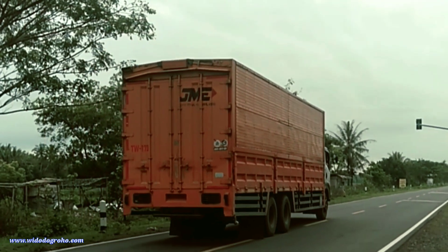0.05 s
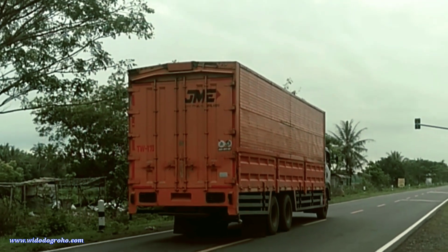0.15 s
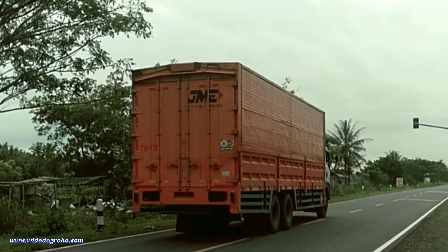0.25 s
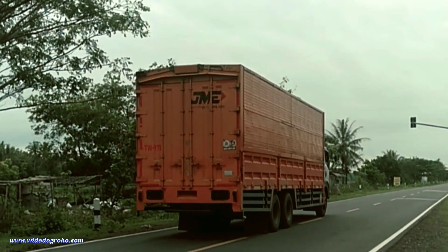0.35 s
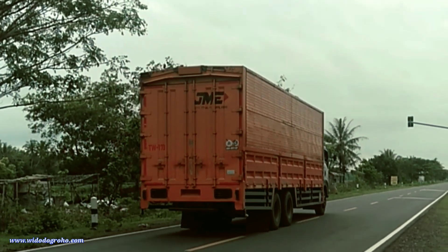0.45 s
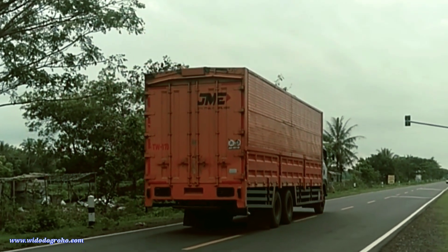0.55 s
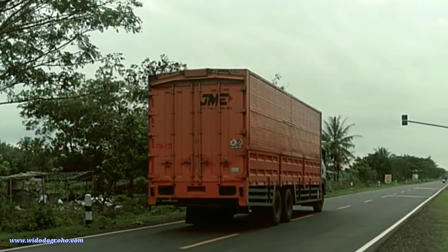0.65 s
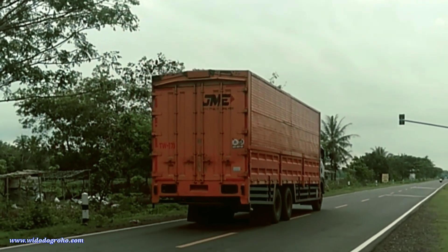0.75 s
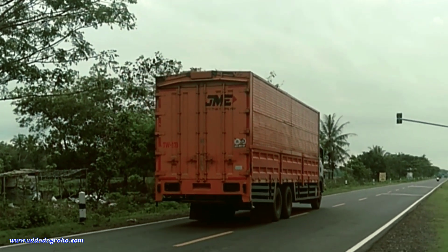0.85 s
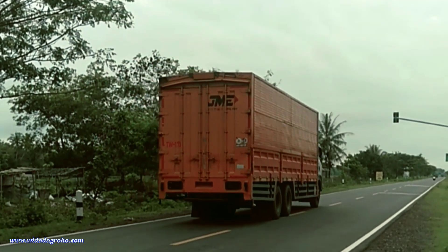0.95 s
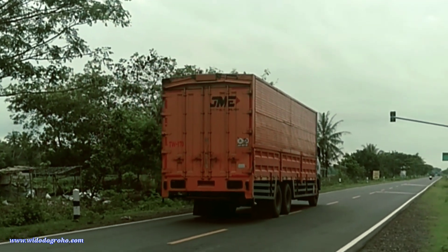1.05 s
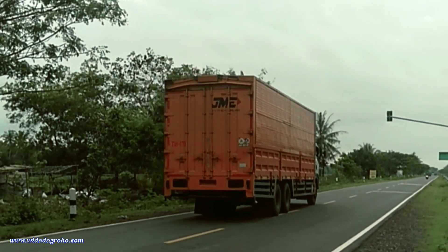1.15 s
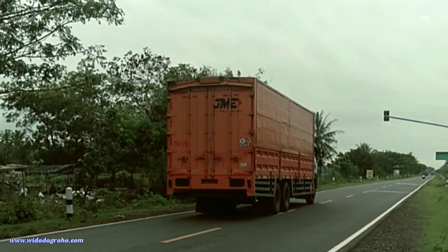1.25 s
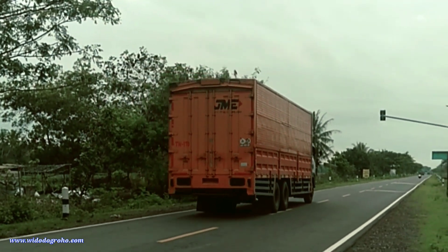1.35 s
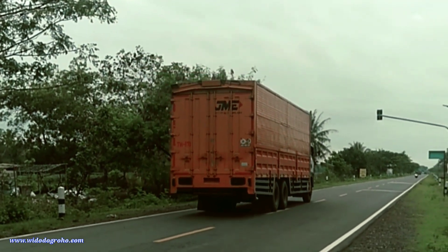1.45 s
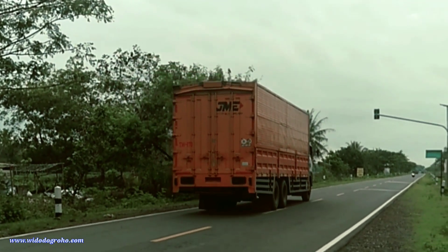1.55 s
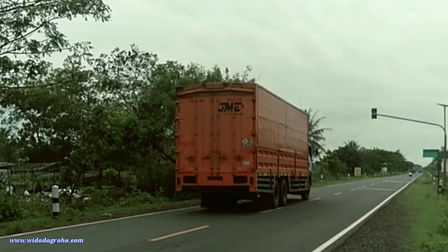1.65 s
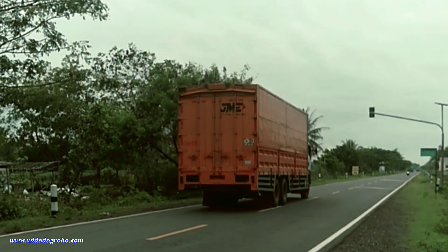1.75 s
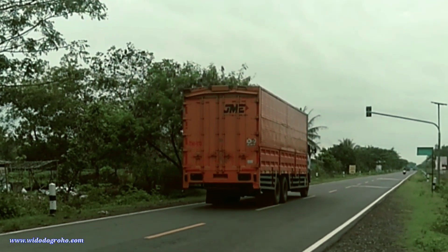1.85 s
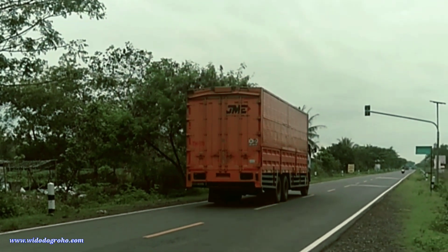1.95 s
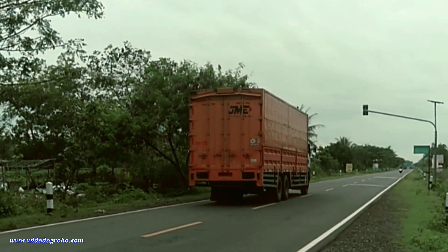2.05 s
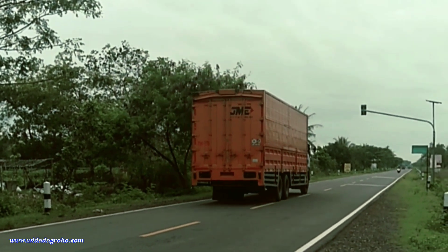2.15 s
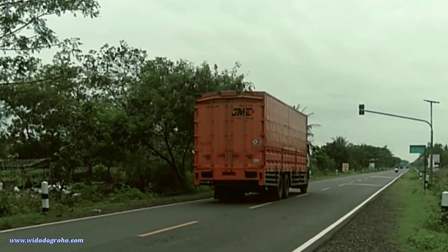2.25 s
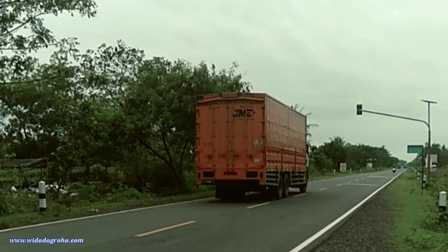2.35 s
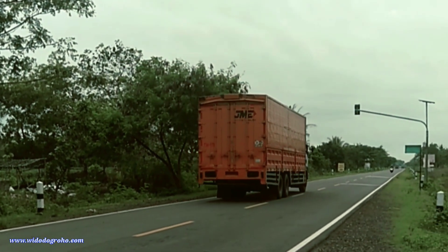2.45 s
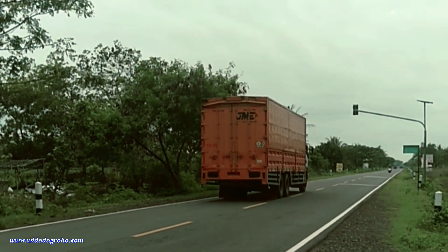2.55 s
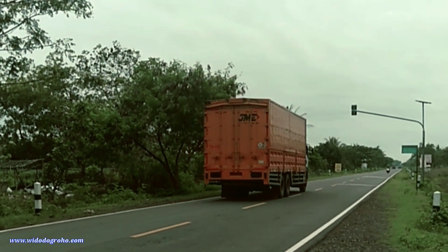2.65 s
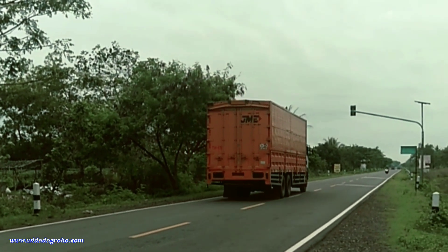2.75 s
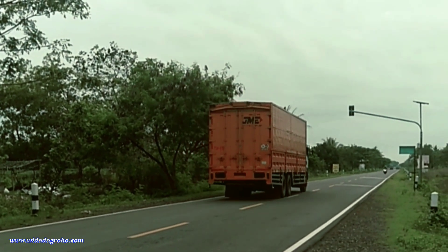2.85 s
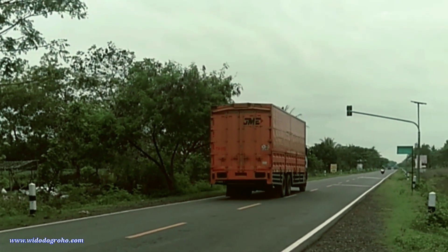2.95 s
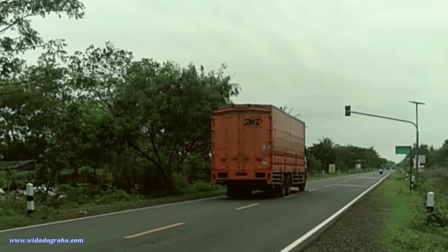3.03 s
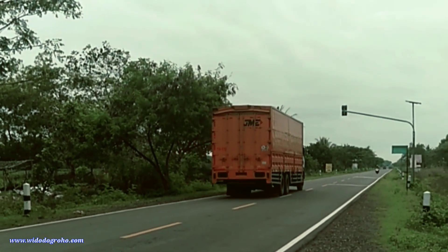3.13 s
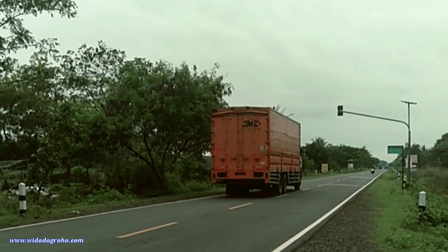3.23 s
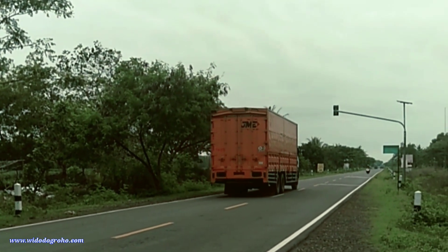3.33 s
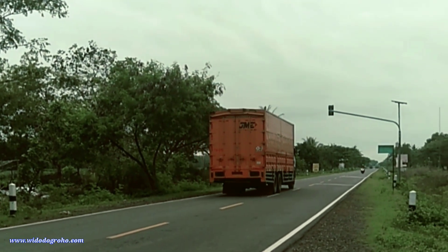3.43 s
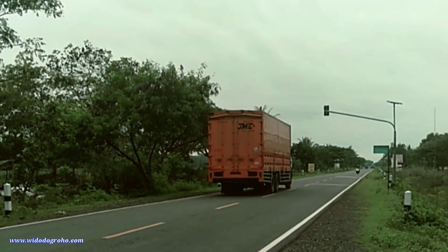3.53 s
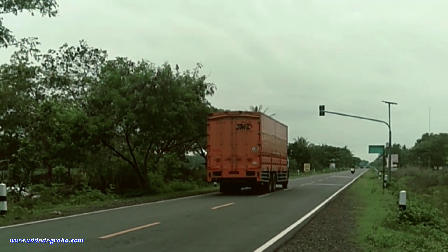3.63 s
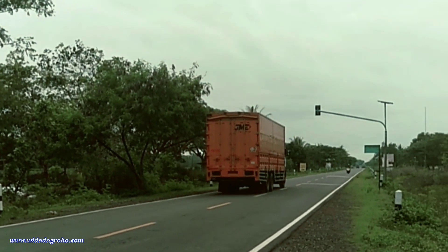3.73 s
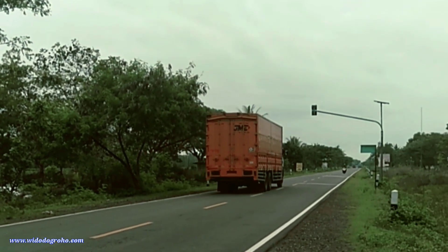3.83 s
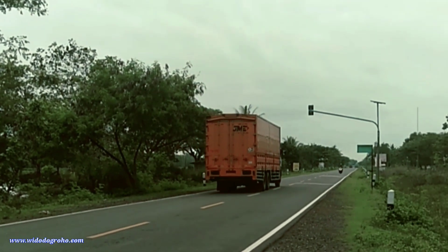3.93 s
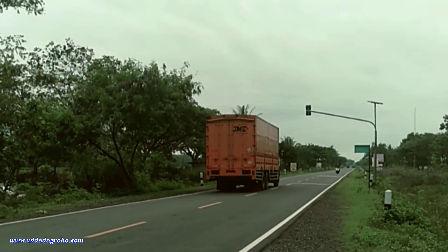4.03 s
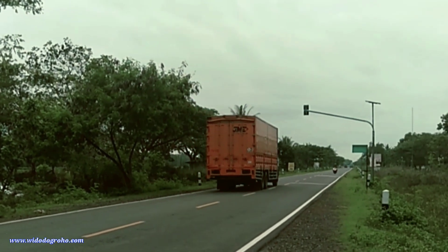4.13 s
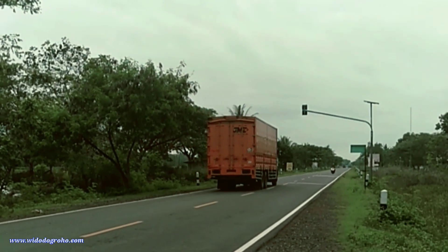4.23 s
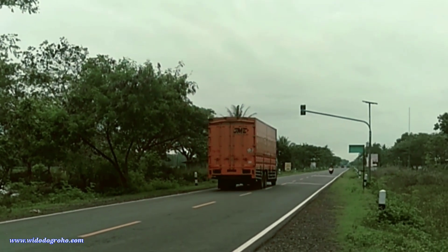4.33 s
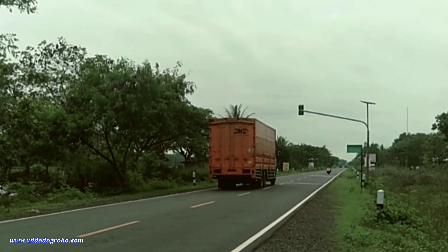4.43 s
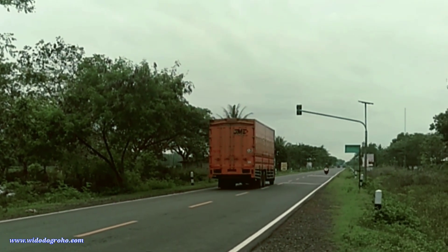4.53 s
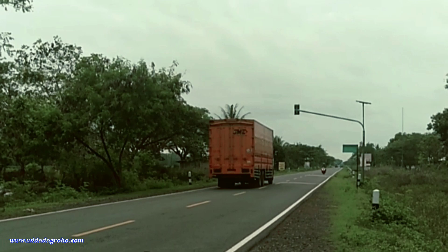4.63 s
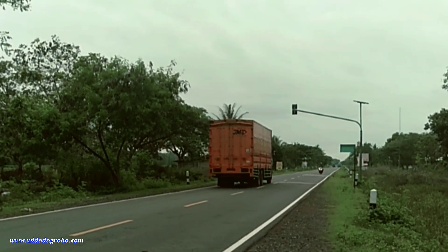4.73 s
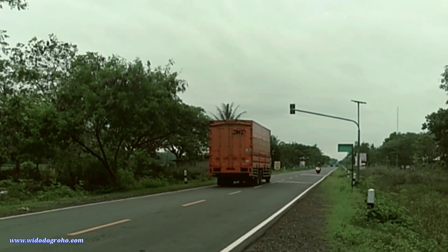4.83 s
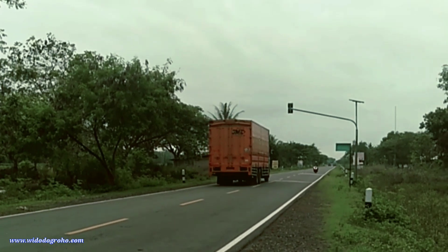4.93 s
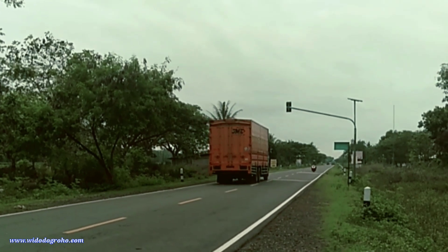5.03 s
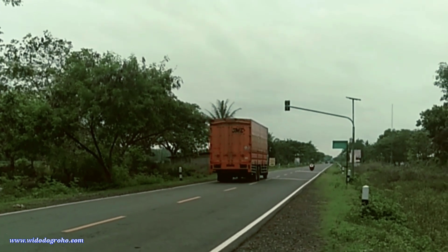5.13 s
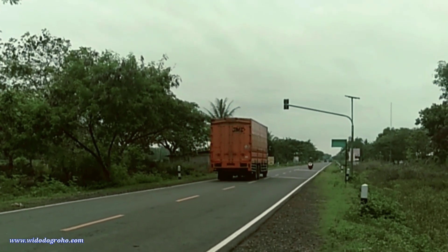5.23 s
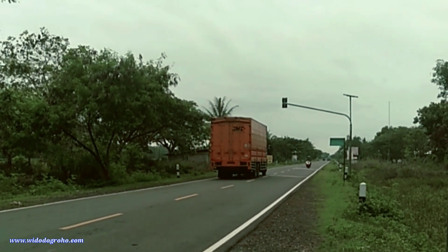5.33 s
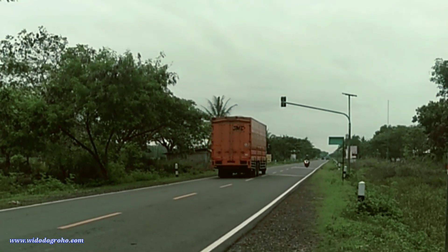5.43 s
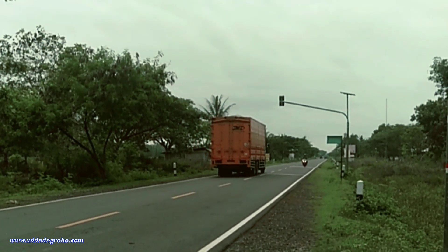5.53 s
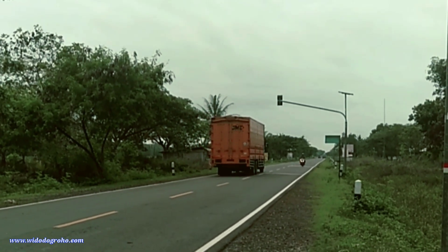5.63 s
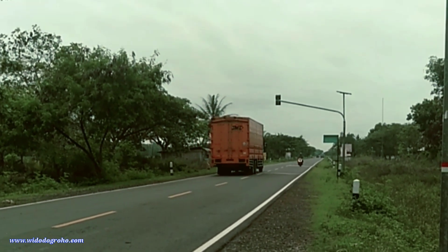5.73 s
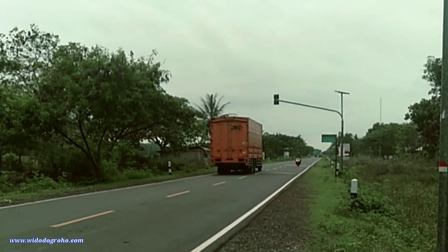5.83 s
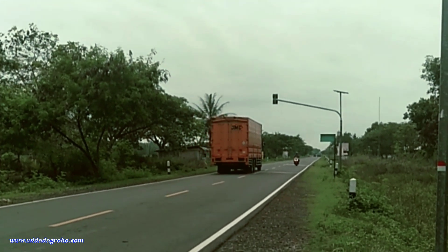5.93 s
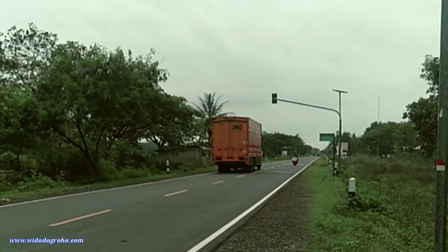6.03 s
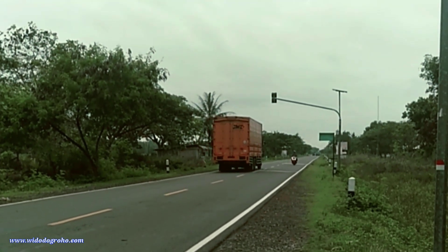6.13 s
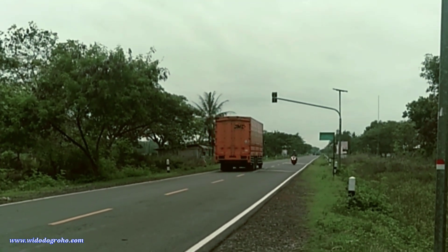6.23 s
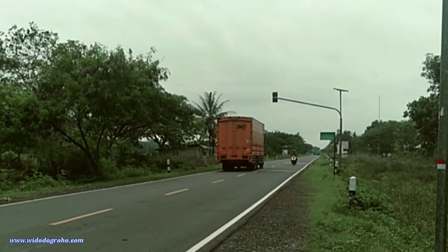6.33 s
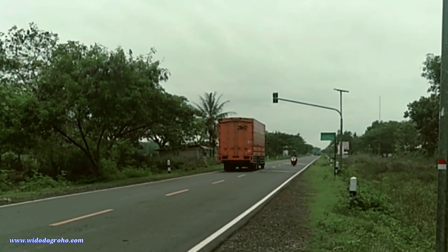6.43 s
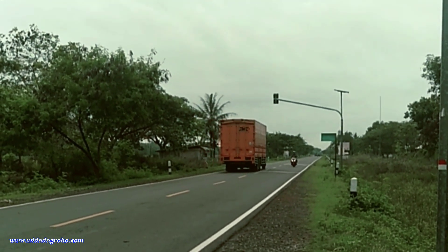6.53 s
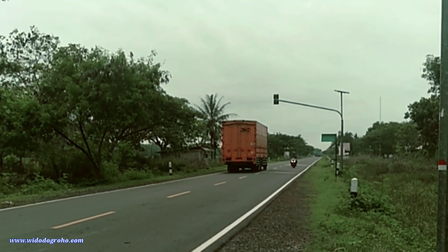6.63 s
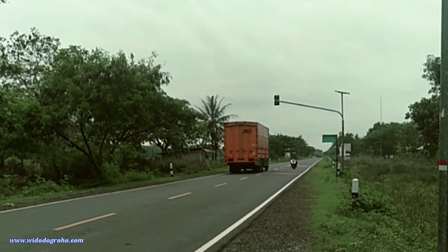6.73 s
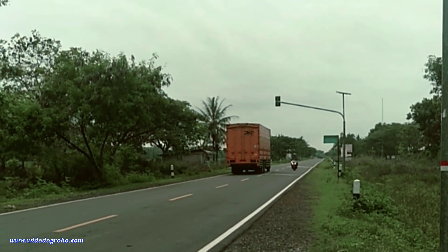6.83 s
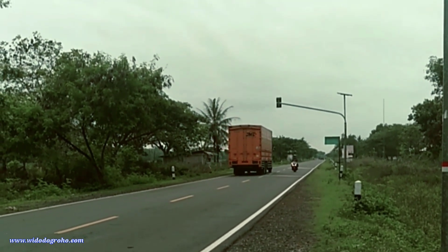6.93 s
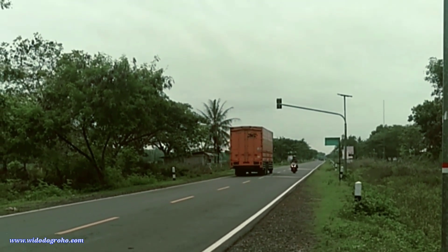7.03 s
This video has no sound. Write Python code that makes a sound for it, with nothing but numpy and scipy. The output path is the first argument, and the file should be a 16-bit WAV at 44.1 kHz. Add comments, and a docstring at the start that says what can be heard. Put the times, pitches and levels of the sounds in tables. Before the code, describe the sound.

A heavy diesel truck drives away from a microphone at an open roadside. From 0 s a deep, throbbing exhaust boom is close and strong, with rough roar, raspy noise and chuffing air. The revs climb steadily until about 3.9 s, with a tiny tick near 1.2 s and sharper spurts of hissing air around 1.7 to 2 s. A wavering whine and a thin high gear whine emerge between 2 and 4 s. At about 4 s the driver lifts off: the boom drops sharply, and a soft jet of air sinks in pitch around 4.5 s. Revs fall through a quieter gap, with a dull knock at 5 s and a faint sinking hum. From about 6.3 s the next gear takes the load, and a low, uneven boom and roar swell again until the end at 7 s. Road rumble, distant hiss and wind buffeting continue underneath.

```python
"""Diesel truck pulling away

A heavy truck on an open road climbs through one gear, the driver lifts off, the revs sink during the change
and the next gear takes the load. Sine waves locked to the firing rate make the exhaust boom and its orders.
Coloured noise, pulsing with the firings, makes roar, clatter and hissing air. Gliding tones make the whines.
Short bursts make a knock and a tick; more noise makes wind, road rumble and distant hiss."""
import sys
import numpy as np
from scipy import signal
from scipy.fft import rfft, irfft, next_fast_len
from scipy.io import wavfile
from scipy.ndimage import uniform_filter1d, map_coordinates

SR = 44100
rng = np.random.default_rng(int(sys.argv[2]) if len(sys.argv) > 2 else 0)


def transcribe(u):
    """Save the signal u as a 16-bit wav file named by the first command-line argument.

    u: samples, shape (n,) or (channels, n), limited to [-1, 1]; the rate is SR.
    q: integer samples, one column per channel.
    """
    v = np.clip(np.atleast_2d(u).T, -1, 1)
    q = np.round(v * 32767).astype(np.int16)
    wavfile.write(sys.argv[1], SR, q)


N = 312228
T = np.arange(N) / SR  # time of each sample, s

# Noise of the truck over time: start_s [s], roar_db [dB], rasp_db [dB], clatter_db [dB]
TRUCK_NOISE = [(0.0, -44, -47, -58.5), (0.7, -44, -47, -58), (1.63, -44, -46, -55.5), (2.44, -43, -46, -55),
               (3.27, -42.5, -46.5, -56), (3.7, -44, -48, -57.5), (4.53, -50, -53.5, -62),
               (6.0, -54.5, -57, -67.5), (6.3, -53, -56.5, -69.5), (7.08, -49.5, -51.5, -61)]
# Noise colours, from body drone up to the highest treble: pitch_hz [Hz], relative level_db [dB per Hz]
DRONE_COLOUR = [(150, -39), (250, -1), (367, -1.5), (503, -1.5), (539, -17.5), (570, -13), (740, -42),
                (1250, -120)]
ROAR_COLOUR = [(320, -37), (550, -14), (600, -9), (672, -5.5), (863, 2), (935, -2), (1100, -5), (1310, -15),
               (1700, -49), (2880, -120)]
RASP_COLOUR = [(760, -38), (1290, -9.5), (1510, 1.5), (1670, 1), (1860, -7), (2140, 0.5), (2260, -0.5),
               (2580, -4.5), (2950, -17.5), (3840, -61), (6490, -120)]
CLATTER_COLOUR = [(1710, -44), (2900, -11.5), (3150, -4.5), (3660, 1), (3870, -1.5), (4000, -6),
                  (4350, -1.5), (5160, -9), (5500, -7.5), (7150, -27), (12100, -120)]
HISS_COLOUR = [(3180, -41), (5400, -11), (5900, -4.5), (6570, 1.5), (7440, 3), (8340, -4.5), (9300, -23),
               (12100, -56), (20500, -120)]
SIZZLE_COLOUR = [(5410, -32), (9200, 0), (9650, -3), (10600, -1.5), (11800, -7), (12300, -9), (13400, -3),
                 (14400, -10), (14900, 0), (15500, -6)]


def truck():
    """One engine phase drives the exhaust and gear tones and the pulsing of the engine and air noise."""
    # The engine pulls, is let off, sinks and takes the next gear: start_s [s], firing_hz [Hz], boom_db [dB]
    engine = [(0.0, 63.9, -26), (0.28, 63.8, -22), (0.44, 68.36, -24.5), (0.7, 68.4, -24),
              (0.94, 73.2, -28), (1.31, 76.9, -29.5), (1.56, 81.56, -29.5), (1.81, 83.93, -27.5),
              (2.12, 88.75, -28.5), (2.7, 96.6, -31.5), (3.31, 105.3, -34.5), (3.92, 106.8, -35),
              (4.05, 104.7, -40.5), (4.14, 102.8, -53), (5.13, 76.94, -68), (5.24, 72.5, -52.5),
              (5.9, 57.65, -48), (6.13, 54.4, -58), (6.29, 58.4, -54), (6.33, 58.6, -43),
              (6.47, 58.8, -36.5), (6.56, 55.5, -39.5), (6.7, 57, -35), (6.87, 55.5, -38),
              (7.0, 57.2, -31.5), (7.08, 55, -38.5)]
    # Pulsing of the air with each firing: start_s [s], depth [0-1]
    chuff_depth = [(0, 0.36), (.4, 0.35), (.55, 0.06), (1.5, 0.13), (2.5, 0.05), (6.3, 0), (6.7, 0.16),
                   (7.08, 0.32)]
    # A wavering whine: start_s [s], pitch_hz [Hz], level_db [dB]
    whine = [(1.7, 570, -66), (2.15, 595, -55), (2.6, 611, -52.5), (3.1, 622.7, -55.5), (3.8, 620, -52.5),
             (4.0, 603, -56), (4.2, 565.5, -64)]
    hz, boom_db = curves(engine)
    phase = 2 * np.pi * np.cumsum(hz) / SR  # one turn of this phase per firing
    depth, = curves(chuff_depth)
    depth = np.clip(depth, 0, 1)
    surge = wobble(9)  # unsteady flow moves all the air noise together
    hiss_spurts, sizzle_spurts = air_spurts()
    out = exhaust(phase, hz, boom_db, engine_load()) + engine_block(phase)
    out += valves(phase, depth, surge, hiss_spurts)
    out += escaping_air(phase, depth, surge, hiss_spurts, sizzle_spurts) + boost_vent()
    return out + timing_gear(phase) + tone(whine, 1.7, 0.63)


def exhaust(phase, hz, boom_db, load_db):
    """The firing rate booms almost as a sine; other shaft orders come up as they cross the pipe's resonances."""
    # Resonances of the pipe: pitch_hz [Hz], width_hz [Hz], relative level_db [dB]
    pipe_resonances = [(54.5, 26, -5.5), (114, 28, 0.5), (305, 58, -8), (331, 21, -6.5), (370.2, 8.4, 2.5),
                       (433.3, 7.5, -0.5), (496, 17, -9), (820, 37, -9.5), (1088, 31, -7.5)]
    # What the pipe passes at twice the firing rate: pitch_hz of the partial [Hz], level_db over the boom [dB]
    second_passed = [(110, -12), (114, -9), (118, -19), (128, -20), (136, -29), (150, -18.5), (175, -30),
                     (197, -14), (212, -19)]
    # The same at three halves of the firing rate: pitch_hz of the partial [Hz], level_db over the boom [dB]
    half_passed = [(84, -19.5), (96, -40), (103, -25.5), (122, -28), (140, -21), (156, -14), (162, -17)]
    second_db = boom_db + np.interp(2 * hz, *np.transpose(second_passed))
    half_db = boom_db + np.interp(3 / 2 * hz, *np.transpose(half_passed))
    out = amp(boom_db + 0.34 * wobble(14)) * np.sin(phase)

    # These upper partials swell briefly during the change
    blip = amp(-50) * bell(4.95, 0.095)
    second_gain = (amp(second_db) + blip) * amp(1.9 * wobble(8.8))
    out += second_gain * np.cos(2 * phase)  # sharpens the troughs, flattens the crests
    half_gain = (amp(half_db) + 0.63 * blip) * amp(2.03 * wobble(9.1))
    out += half_gain * (np.sin(3 / 2 * phase) + 0.26 * np.sin(phase / 2))

    for turn in range(2, 52):  # multiples of the shaft rate
        if turn in (3, 6):  # the firing rate and its double are already there
            continue
        order = turn / 3  # six cylinders fire three times per shaft turn
        power = sum(amp(2 * db) / (1 + (2 * (hz * order - centre) / width) ** 2)
                    for centre, width, db in pipe_resonances)
        pipe_gain = np.sqrt(power)
        uneven_db = -4.5 * (turn % 3 > 0)  # orders between the firing harmonics come from unlike cylinders
        drift = .07 * order * wobble(12)  # firing jitter smears the high orders most
        start = rng.uniform(0, 2 * np.pi)
        level = amp(load_db + uneven_db + 2.43 * wobble(4.106))
        out += pipe_gain * level * np.sin(order * phase + drift + start)
    return np.sqrt(2) * out


def engine_load():
    """Level of the shaft orders before the pipe, in dB: fades with distance and drops with the throttle closed."""
    lift_s, resume_s, pedal_s = 4.03, 6.7, .3  # middle of closing, middle of opening, time of each travel
    start_db, fade_db_per_s, coast_db = -47, -1.6, -8.5
    closed = np.clip(np.minimum(T - lift_s, resume_s - T) / pedal_s + .5, 0, 1)
    return start_db + fade_db_per_s * T + coast_db * closed


def engine_block(phase):
    """Roar and rasp are noise pulsing gently with the firings; an unpulsed drone rises and falls with the roar."""
    drone_db = -8  # over the roar
    roar_db, rasp_db, _ = curves(TRUCK_NOISE)
    block = amp(roar_db) * rush(ROAR_COLOUR, 0.73, firings(phase, 0.14))
    block += amp(roar_db + drone_db) * rush(DRONE_COLOUR, 0.99)
    return block + amp(rasp_db) * rush(RASP_COLOUR, 0.65, firings(phase, 0.051))


def valves(phase, depth, surge, hiss_spurts):
    """Valve clatter is mid-treble noise pulsing with the firings; the air spurts add to it."""
    share_db = -10.5  # share of a spurt heard in the clatter band
    clatter_db = curves(TRUCK_NOISE)[2]
    level = np.hypot(amp(clatter_db), amp(share_db) * hiss_spurts)
    return level * amp(0.57 * surge) * rush(CLATTER_COLOUR, 1.1, firings(phase, 0.23 * depth + 0.062))


def escaping_air(phase, depth, surge, hiss_spurts, sizzle_spurts):
    """Turbulent air gives hiss and a higher sizzle, both chuffing with the firings."""
    # Level of the highest treble without spurts: start_s [s], level_db [dB]
    top_level = [(0, -68.5), (1.6, -67.5), (2.3, -63.5), (3.04, -60.5), (3.5, -64), (4.1, -65.5),
                 (4.5, -72), (6.0, -75), (7.08, -71.5)]
    start_db, swing = -57.5, 1.3  # hiss level at the start; its level swings wider than the clatter's
    clatter_db = curves(TRUCK_NOISE)[2]
    hiss = np.hypot(amp(start_db + swing * (clatter_db - clatter_db[0])), hiss_spurts)
    sizzle = np.hypot(amp(curves(top_level)[0]), sizzle_spurts)
    chuff = firings(phase, depth)
    air = hiss * amp(0.77 * surge) * rush(HISS_COLOUR, 1.35, chuff)
    return air + sizzle * amp(0.5 * surge) * rush(SIZZLE_COLOUR, 1.9, 0.36 * chuff + 0.65)


def air_spurts():
    """Loudness curves, for hiss and for sizzle, of spurts of air that rise and fall exponentially."""
    # Spurts of air: peak_s [s], rise_s [s], fall_s [s], hiss_db [dB], sizzle_db [dB]
    spurt_rows = [(.35, .9, .07, -52.5, -66), (0.689, .08, 0.077, -55.5, -75), (1.74, 0.054, .15, -55, -68),
                  (1.97, 0.063, 0.26, -46.5, -61), (5.8, .03, .08, -70, -72)]
    hiss = sum(amp(hiss_db) * spurt(s, rise, fall) for s, rise, fall, hiss_db, _ in spurt_rows)
    sizzle = sum(amp(sizzle_db) * spurt(s, rise, fall) for s, rise, fall, _, sizzle_db in spurt_rows)
    return hiss, sizzle


def boost_vent():
    """Boost air let off as the throttle closes: a noise jet that sinks in pitch as the pressure falls."""
    # Colour of the jet at the end of its sinking: pitch_hz [Hz], relative level_db [dB per Hz]
    nozzle = [(3650, -43), (6200, -18), (7500, 15), (7760, 0), (8030, 0), (8600, -5), (11200, -44),
              (18900, -120)]
    vent_s, width_s, level_db = 4.47, 0.26, -55.5
    early = np.clip(.5 - (T - vent_s) / (2 * width_s), 0, 1)
    higher = [(hz * 1.07, db) for hz, db in nozzle]  # the jet starts this much higher
    # Crossfade from the higher colour to the lower one
    jet = np.sqrt(early) * rush(higher, 1.5) + np.sqrt(1 - early) * rush(nozzle, 1.5)
    return bell(vent_s, width_s) * amp(level_db + 1.7 * wobble(23)) * jet


def timing_gear(phase):
    """Gear teeth meshing 22 times per firing make a whine that follows the revs."""
    # Level of the timing gear: start_s [s], level_db [dB]
    gear_level = [(2.0, -78), (2.2, -70), (2.5, -61), (3.1, -54), (3.8, -64), (4.1, -82)]
    level = amp(curves(gear_level)[0] + 3 * wobble(8))
    return level * np.sin(phase * 66 / 3 + 2.0 * wobble(30))


def puffs():
    """Brief noise bursts swell and die within hundredths of a second: a knock of the gear change, a tick."""
    # Bursts: middle_s [s], spread_s [s], then body_db, roar_db, rasp_db, treble_db, top_db [all dB]
    bursts = [(5.011, .012, -49, -41, -45, -58, -78), (1.18, .0005, -80, -80, -80, -64, -50)]
    treble = rush(CLATTER_COLOUR, 0) + rush(HISS_COLOUR, 0)
    bands = rush(DRONE_COLOUR, 0), rush(ROAR_COLOUR, 0), rush(RASP_COLOUR, 0), treble, rush(SIZZLE_COLOUR, 0)
    return sum(bell(s, spread) * (amp(levels_db) @ bands) for s, spread, *levels_db in bursts)


def roadside():
    """Noise bands give wind on the microphone, tyre and traffic rumble and distant hiss; a faint note sinks."""
    # Colours of wind, road rumble, traffic and steady distant hiss: pitch_hz [Hz], relative level_db [dB per Hz]
    buffet = [(8.8, -33), (15, -3), (27, -7), (60, -2), (78, -28), (130, -120)]
    rumble = [(24, -30), (40, -3.5), (129, -1.5), (156, -2.5), (220, -5), (290, -24), (480, -120)]
    traffic = [(53, -34), (90, -4.5), (200, -2.5), (275, -22), (363, -13), (404, -21), (450, -12.5),
               (640, -21), (830, -58), (1410, -120)]
    far_hiss = [(1470, -35), (2500, -17), (2620, -2), (2850, 5.5), (3140, 7), (5080, -34), (9430, -4.5),
                (10600, -23), (15500, -17)]
    # Wind gusts: middle_s [s], width_s [s], level_db [dB]
    gusts = [(.24, .08, -44), (1.8, .1, -50), (6.7, 0.075, -43), (7.08, .05, -41)]
    # A faint sinking note: start_s [s], pitch_hz [Hz], level_db [dB]
    hum = [(4.8, 206, -61), (5.2, 198.5, -60), (5.7, 190.3, -61), (5.9, 187, -64)]
    roar_db = curves(TRUCK_NOISE)[0]
    rumble_db = -47 + 0.54 * (roar_db - roar_db[0])  # level at the start; partly follows the roar
    wind = amp(-59.5) + sum(amp(db) * bell(s, width) for s, width, db in gusts)  # steady breeze plus gusts
    out = wind * amp(1.1 * wobble(10)) * rush(buffet, 0)
    out += amp(rumble_db) * rush(rumble, 0.7) + amp(-57) * rush(traffic, 1.5)
    return out + tone(hum, 1.85, 0.34) + amp(-70.0) * rush(far_hiss, .6)


def firings(phase, depth):
    """A gain that pulses once per firing, each firing at its own strength."""
    count = (phase / (2 * np.pi)).astype(int)
    size = amp(4.4 * rng.standard_normal(count[-1] + 1))[count]
    pulse = size * np.sin(phase / 2) ** 2 * 2 - 1
    return (1 + depth * pulse) / np.sqrt(1 + depth ** 2 / 2)


def rush(spectrum, patchy_db, pulsing=1):
    """Coloured noise of rms 1 with random gain over patches of time and pitch, like turbulent flow."""
    z = signal.stft(rng.standard_normal(N) * pulsing, nperseg=512)[2]
    patches = uniform_filter1d(rng.standard_normal(z.shape), 5, 0)  # smooth over pitch
    patches = uniform_filter1d(patches, 8, 1)  # smooth over time
    noise = signal.istft(z * amp(patchy_db * unit(patches)), nperseg=512)[1][:N]
    f, db = np.transpose(spectrum)
    return unit(filtered(noise, lambda hz: amp(np.interp(np.log(hz + 1), np.log(f + 1), db))))


def tone(rows, waver_db, blur):
    """A gliding, slightly unsteady sine that sounds only over the span of its rows."""
    hz, db = curves(rows)
    gate = np.clip(np.minimum(T - rows[0][0], rows[-1][0] - T) / 0.05, 0, 1)
    level = np.sqrt(2) * gate * amp(db + waver_db * wobble(8))
    return level * np.sin(2 * np.pi * np.cumsum(hz) / SR + blur * wobble(16))


def bell(s, width):
    """A smooth swell around s."""
    return np.exp(-.5 * ((T - s) / width) ** 2)


def spurt(s, rise, fall):
    """Exponential rise to s, exponential fall after it."""
    return np.exp(-np.abs(T - s) / np.where(T < s, rise, fall))


def wobble(rate):
    """A smooth random curve through rate random points a second."""
    return map_coordinates(rng.standard_normal(int(N * rate / SR) + 4), [T * rate])


def curves(rows):
    """One value per sample for each column after the time."""
    s, *cols = np.transpose(rows)
    return [np.interp(T, s, c) for c in cols]


def filtered(x, response):
    """Shape the spectrum of x by a response that depends on frequency."""
    m = next_fast_len(N + SR // 4)  # spare room so the filter's tail does not wrap around
    return irfft(rfft(x, m) * response(np.fft.rfftfreq(m, 1 / SR)), m)[..., :N]


def amp(db):
    """Decibels to a plain gain."""
    return 10 ** (np.asarray(db) / 20)


def unit(x):
    """Scale x to an rms of 1."""
    return x / np.sqrt(np.mean(x ** 2) + 1e-20)


def scene():
    """The truck, the short bursts and the roadside together, in one channel."""
    return (truck() + puffs() + roadside())[None]


def record(dry):
    """Cavities around the microphone lift a few narrow bands; nothing passes above the band limit."""
    # Narrow resonances around the microphone: pitch_hz [Hz], width_hz [Hz], added gain [plain factor]
    housing = [(812, 9.8, 0.071), (1086, 17, 0.11), (1680, 51, 0.15), (3610, 105, 0.22), (6900, 32, 0.18),
               (7020, 90, .3), (7420, 90, .25), (7560, 66, 0.19), (8300, 110, 0.16), (10350, 340, 0.33),
               (13000, 260, .4), (13650, 320, 0.54), (15500, 400, 0.32)]
    top_hz = 15520

    def response(f):
        lift = 1 + sum(gain * 1j * f * w / (c * c - f * f + 1j * f * w) for c, w, gain in housing)
        return lift * (f < top_hz)

    return filtered(dry, response)


dry = scene()
out = record(dry)
transcribe(out)
```